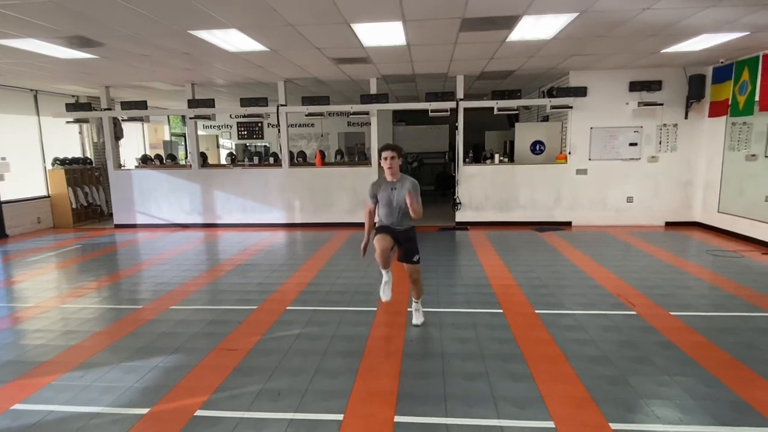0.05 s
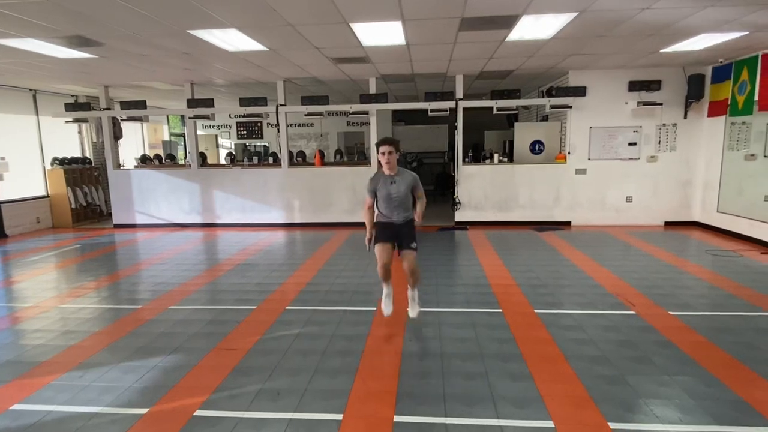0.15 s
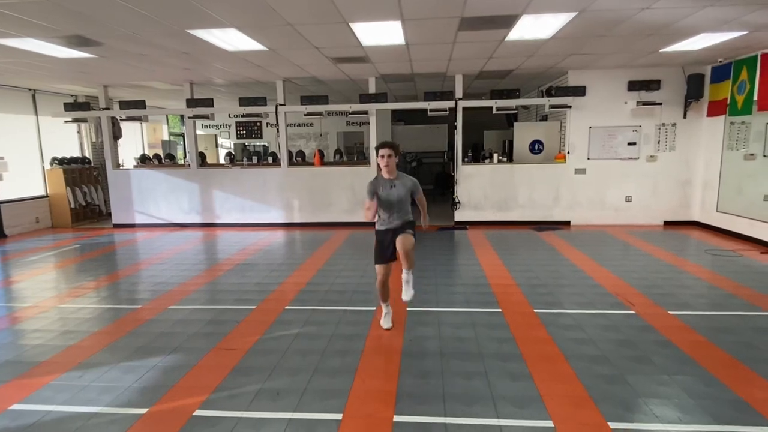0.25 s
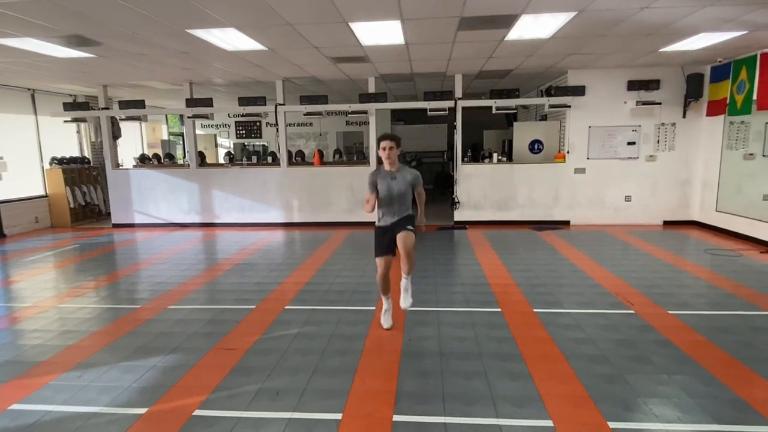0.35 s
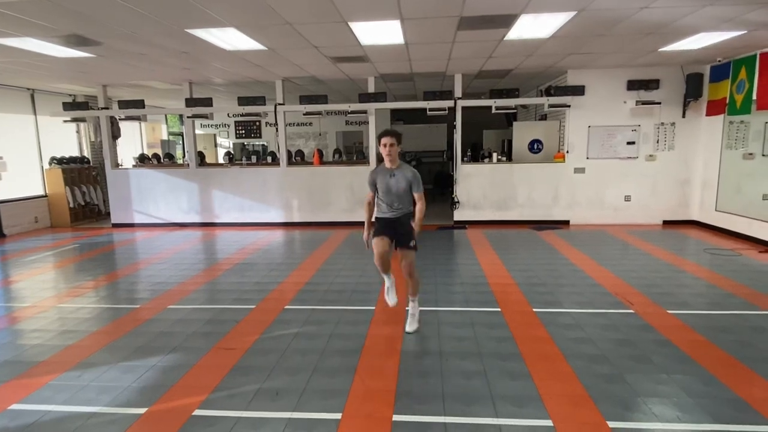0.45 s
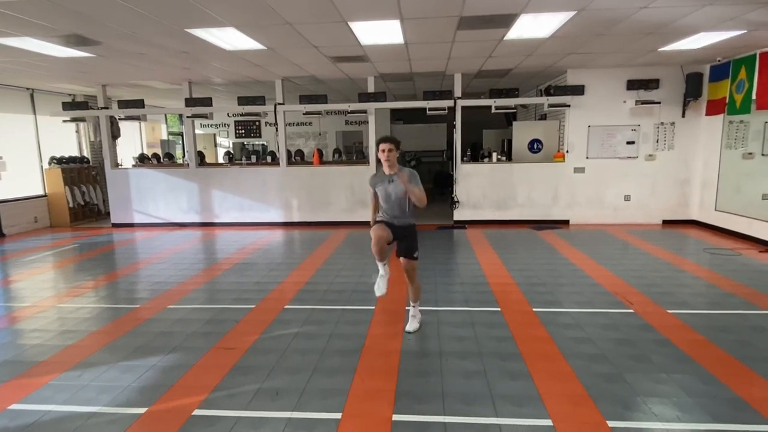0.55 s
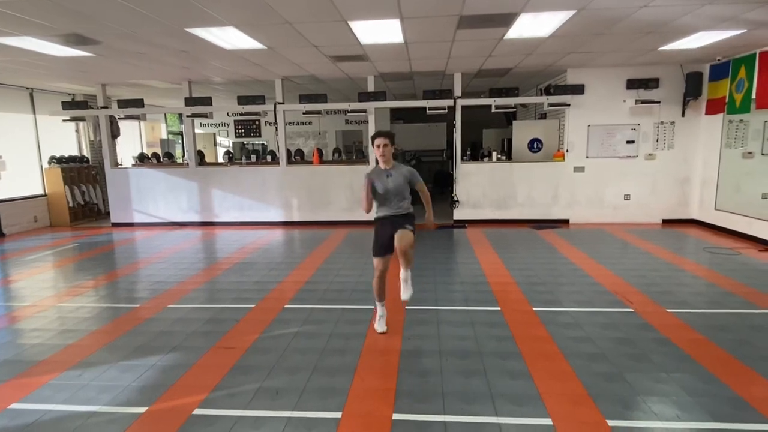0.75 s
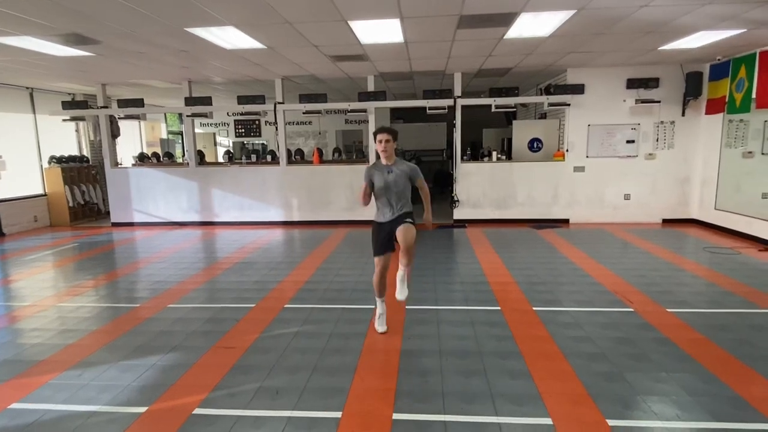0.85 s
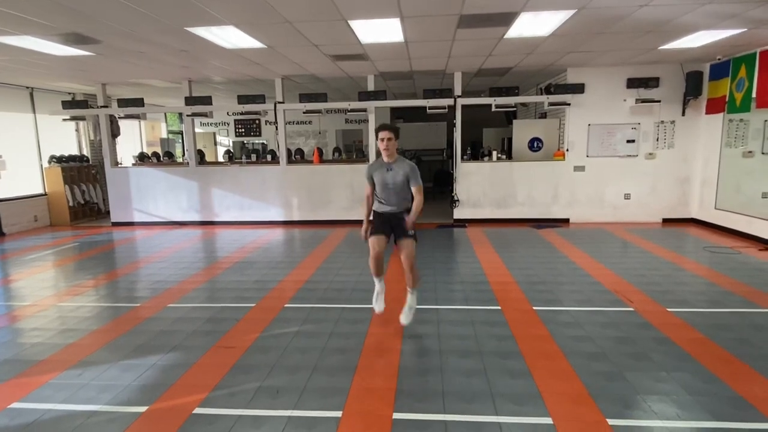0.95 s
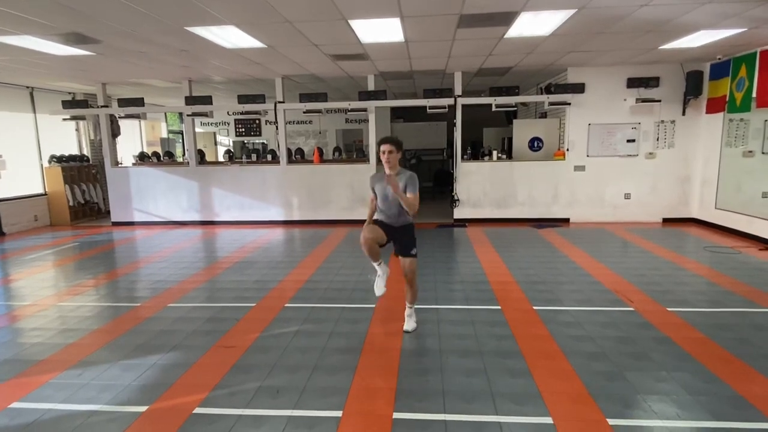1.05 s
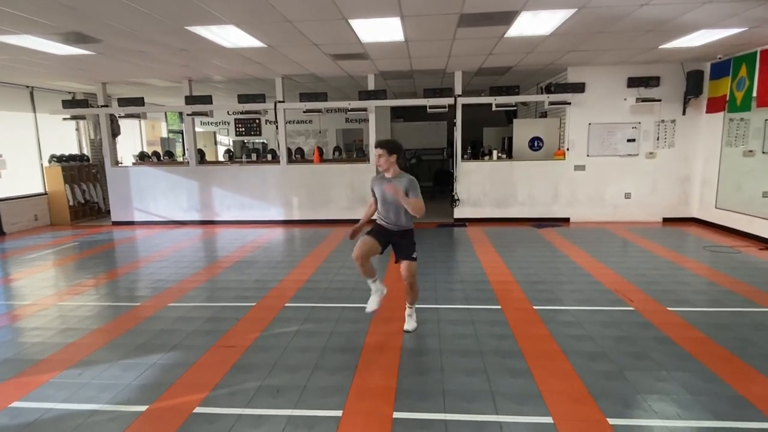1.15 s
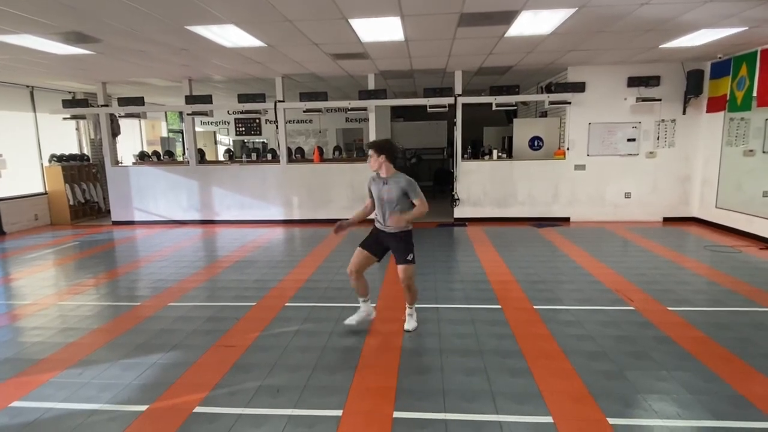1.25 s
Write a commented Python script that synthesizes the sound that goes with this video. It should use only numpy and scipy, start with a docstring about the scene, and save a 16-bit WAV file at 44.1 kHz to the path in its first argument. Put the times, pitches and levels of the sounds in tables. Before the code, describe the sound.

Running footsteps in trainers land on hollow plastic tiles a few metres away. Four quick, even thuds come with sole slaps, light rattles and faint scuffs, echoing in a gym over a low ventilation hum.

```python
"""A gym with a floor of hollow plastic tiles, where someone runs in trainers a few metres away.
Each impact excites the bending modes of a tile; the sole ticks and slaps, the tile joints rattle,
and short clacks and a softer heel contact may follow. Brushing soles add stick-slip friction noise.
Ceiling and walls return early reflections and a diffuse tail, over a low ventilation hum."""
import sys
import numpy as np
from scipy import signal
from scipy.fft import rfft, irfft
from scipy.io import wavfile

SR = 44100
rng = np.random.default_rng(int(sys.argv[2]) if len(sys.argv) > 2 else 0)


def inscribe(sig):
    """Save sig as 16-bit PCM at rate SR to the path in sys.argv[1].

    A 1-D sig is mono; a 2-D sig holds one channel per row.
    Samples are clipped to [-1, 1] before scaling.
    """
    pcm = np.round(np.clip(np.atleast_2d(sig).T, -1, 1) * 32767)
    wavfile.write(sys.argv[1], SR, pcm.astype(np.int16))


N = 57330
LEAD = int(.2 * SR)  # run-in, so that the hall already rings at time zero
T = np.arange(-LEAD, N) / SR


def amp(db):
    """Decibels to amplitude ratio."""
    return 10 ** (np.asarray(db) / 20)


def pan(db):
    """Left and right gains for a level difference."""
    return amp(np.array([[db], [-db]]) / 2)


def curve(hz, table, column=1):
    """Interpolation of a table column over log frequency."""
    rows = np.array(table, float)
    return np.interp(np.log(np.maximum(hz, 1)), np.log(rows[:, 0]), rows[:, column])


def colour(x, spectrum):
    """Minimum-phase filter with the given spectral shape and unit power gain."""
    size = 8192
    gain = amp(curve(np.fft.rfftfreq(size, 1 / SR), spectrum))
    cepstrum = irfft(np.log(gain / np.sqrt(np.mean(gain ** 2))))
    cepstrum[1:size // 2] *= 2
    cepstrum[size // 2 + 1:] = 0
    response = irfft(np.exp(rfft(cepstrum)))[None, :size // 2]
    return signal.fftconvolve(x, response, axes=1)[:, :len(T)]


def soften(x, hz):
    """First-order low-pass."""
    return signal.sosfilt(signal.butter(1, hz, fs=SR, output="sos"), x)


def late(x, delay):
    """Propagation delay of one channel."""
    return np.interp(T - delay, T, x, left=0)


def stereo(mid, side, correlation):
    """Sum and difference of independent signals give a partly correlated pair."""
    return np.sqrt((1 + correlation) / 2) * mid + np.sqrt((1 - correlation) / 2) * np.array([side, -side])


def noise(correlation):
    """Partly correlated left and right white noise."""
    return stereo(*rng.standard_normal((2, len(T))), correlation)


def strike(age, rise, decay):
    """Transient envelope: exponential rise and decay, time constants in seconds."""
    age = np.maximum(age, 0)
    return (1 - np.exp(-age / rise)) * np.exp(-age / decay)


# Airflow spectrum: (frequency [Hz], relative level [dB])
AIR_SPECTRUM = [(20, -9), (40, -6), (61, 8), (130, 1.5), (256, 3), (384, -8.5), (607, -14.5), (2100, -17.5),
                (5400, -40.5), (8400, -37.5), (16000, -57)]
def ventilation():
    """A tone over broadband noise: a low, wavering hum and a soft rush of air."""
    hum_hz, hum_db, air_db = 47.8, -53.5, -54.5
    waver_db = .5 * np.interp(T, np.linspace(T[0], T[-1], 16), rng.standard_normal(16))
    hum = np.sqrt(2) * amp(hum_db + waver_db) * np.sin(2 * np.pi * hum_hz * T)
    return hum + amp(air_db) * colour(noise(correlation=.75), AIR_SPECTRUM)


# Diffuse tail: (frequency [Hz], level [dB], decay time T60 [s])
TAIL_BANDS = [(61.6, -36, 1), (129.3, 7, 0.52), (244, -4.5, 0.55), (336, -3.5, 0.43), (417, -4.5, 0.29),
              (680, -4, 0.63), (1420, -4, 0.63), (2900, -1, 0.58), (4800, 0, 0.88), (9650, -4.5, 0.44),
              (17100, -7.5, 0.13)]
# Coherence of the diffuse field: (frequency [Hz], left-right correlation [0-1])
TAIL_CORRELATION = [(60, 0.98), (140, 1), (250, 0.61), (450, 0.013), (1500, 0.032), (5000, 0.022)]
def reverberation(x):
    """A diffuse tail that fades exponentially, with the highest treble rolled off."""
    age = T - T[0] - .002  # 2 ms pre-delay
    octave = np.log2(np.maximum(np.fft.rfftfreq(len(T), 1 / SR), 1))
    white = rfft(noise(0))
    tail = 0
    for hz in 1000 * 2. ** (np.arange(-9, 9) / 2):  # half-octave bands
        band = np.cos(np.pi / 2 * np.clip(2 * (octave - np.log2(hz)), -1, 1)) ** 2
        decay = curve(hz, TAIL_BANDS, column=2) / np.log(1000)
        waves = irfft(white * band, len(T)) * strike(age, rise=.0081, decay=decay)
        waves *= np.sqrt(np.mean(band ** 2) / np.sum(waves ** 2, axis=1, keepdims=True))
        tail += amp(curve(hz, TAIL_BANDS)) * stereo(*waves, curve(hz, TAIL_CORRELATION))
    return pan(db=2.5) * signal.fftconvolve(x, tail, axes=1)[:, :len(T)]


# Echo paths: (delay [s], extra delay on the right [s], left level [dB], right level [dB], cutoff [Hz])
ECHO_PATHS = [(0.0119, .0003, -10.5, -10, 9000), (0.0205, -.0009, -16.5, -29, 4000),
              (0.0279, .0011, -16.5, -18.5, 4000), (0.0325, 0.00092, -16, -9.5, 5000),
              (0.0408, -0.0071, -14, -16, 10000), (.047, .0008, -12, -13.5, 3000)]
def early_reflections(x):
    """Specular reflection: ceiling and walls return delayed, weaker, duller copies."""
    out = np.zeros_like(x)
    for delay, skew, left_db, right_db, cutoff_hz in ECHO_PATHS:
        left, right = soften(x, cutoff_hz)
        out[0] += amp(left_db) * late(left, delay)
        out[1] += amp(right_db) * late(right, delay + skew)
    return out


CONTACT_CORRELATION = .55  # between left and right, for scuffs, clatter, rattle and slaps
# Soles brushing the floor: (time [s], level [dB], decay [s], centre frequency [Hz])
BRUSHES = [(.222, -49.5, 0.0078, 6850), (0.235, -45, 0.013, 4130), (0.484, -54.5, 0.032, 3512),
           (0.7195, -43, 0.0035, 6370), (.738, -47.5, 0.0075, 6140), (1.021, -46.5, 0.04, 2220),
           (1.069, -52.5, 0.038, 4600), (1.271, -57.5, 0.032, 2692)]
# Friction spectrum: (frequency / centre frequency [ratio], relative level [dB])
FRICTION_SPECTRUM = [(.1, -25), (.5, -12.5), (.8, -0.5), (1, 2), (1.3, -10), (1.8, -11.5), (3, -35)]
def scuffs():
    """Stick-slip friction: a brushing sole catches and slips, so its noise jumps in level."""
    slips_per_s, spread_db = 480, 5.5
    slip_index = np.cumsum(rng.random(len(T)) < slips_per_s / SR)
    grit = amp(spread_db * rng.uniform(-1, 1, len(T)))[slip_index]
    out = 0
    for start, db, decay, centre_hz in BRUSHES:
        envelope = amp(db) * grit * strike(T - start, rise=.002, decay=decay)
        spectrum = [(centre_hz * ratio, level) for ratio, level in FRICTION_SPECTRUM]
        out += colour(envelope * noise(CONTACT_CORRELATION), spectrum)
    return out


# Short clacks and bright clicks after the steps: (time [s], clack level [dB], click level [dB])
CLATTER_EVENTS = [(0.2168, -47, -32), (.3146, -34, -46), (0.5033, -23.5, -44), (.5155, -28, -44),
                  (0.5311, -45, -40.5), (0.54, -53, -45), (0.725, -54, -49), (.745, -47, -51),
                  (1.009, -24.5, -54), (1.022, -27, -50)]
# Spectra of the clack and the click: (frequency [Hz], relative level [dB])
CLACK_SPECTRUM = [(700, -16), (1800, 7), (2600, 1.5), (3800, -14), (8000, -37)]
CLICK_SPECTRUM = [(2000, -23), (5000, 2.5), (11000, 1), (14000, -29)]
def clatter():
    """Broadband transients: short noise bursts stand for sharp echoes and tile clatter."""
    clack = click = 0
    for start, clack_db, click_db in CLATTER_EVENTS:
        pulse = strike(T - start, rise=.00054, decay=.00095)
        clack += amp(clack_db) * pulse
        click += amp(click_db) * pulse
    clacks = colour(clack * noise(CONTACT_CORRELATION), CLACK_SPECTRUM)
    return clacks + colour(click * noise(CONTACT_CORRELATION), CLICK_SPECTRUM)


# Spectrum of shaken joints: (frequency [Hz], relative level [dB])
RATTLE_SPECTRUM = [(100, -11), (350, 15.5), (700, 7.5), (1400, 7), (2300, -9), (3500, -15), (5200, -25.5),
                   (9000, -26), (16000, -41)]
def joint_rattle(contacts):
    """Shot noise: each contact shakes a spatter of randomly timed clicks from the tile joints."""
    clicks_per_s, spread_db = 730, .5
    envelope = sum(amp(db) * strike(T - start, rise=.011, decay=.022)
                   for start, _, _, _, _, _, _, db, *_ in contacts)
    clicks = np.sign(noise(CONTACT_CORRELATION)) * (rng.random(len(T)) < clicks_per_s / SR)
    clicks *= amp(spread_db * rng.uniform(-1, 1, len(T)))
    return colour(envelope * clicks / clicks.std(), RATTLE_SPECTRUM)


# Spectrum of the first touch: (frequency [Hz], relative level [dB])
TICK_SPECTRUM = [(500, -29.5), (2500, -2.5), (3700, -5.5), (6000, 3), (8000, -1), (10500, 2.5),
                 (13000, -8.5), (16000, -5)]
def sole_ticks(steps):
    """A brief contact has a wide bandwidth: rubber first meets plastic with a bright tick."""
    pivot_hz = 6000
    out = 0
    for start, *_, tick_db, tilt in steps:
        spectrum = [(hz, db + tilt * np.log2(hz / pivot_hz)) for hz, db in TICK_SPECTRUM]
        envelope = amp(tick_db) * strike(T - start, rise=.0015, decay=.0014)
        out += colour(envelope * noise(0), spectrum)
    return out


# Spectrum of a flattening sole: (frequency [Hz], relative level [dB])
SLAP_SPECTRUM = [(100, -43), (400, 0), (900, 3.5), (1450, 1.5), (2000, -0.5), (2800, -6.5), (4000, -19.5),
                 (8000, -30), (11500, -26), (16000, -77)]
def sole_slaps(contacts, rise, decay):
    """Impact noise: a short burst as each sole flattens on the tile."""
    envelope = sum(amp(db) * strike(T - start, rise, decay) for start, _, _, _, _, _, db, *_ in contacts)
    return colour(envelope * noise(CONTACT_CORRELATION), SLAP_SPECTRUM)


# Bending modes of a tile: (frequency [Hz], level [dB], decay time T60 [s])
TILE_MODES = [(93.5, -21, 0.078), (154, -13, 0.034), (223.2, -8.5, 0.048), (256.7, 4, 0.047),
              (321, -9.5, 0.041), (391.6, -6.5, 0.042), (487.3, -14, 0.057), (649, -0.5, 0.022),
              (735, -18, 0.028), (913, -12, 0.024), (1072, -21.5, 0.071), (1387, -23.5, 0.029),
              (1836, -25, 0.015)]
# Where the weight, thump, hollow and knock bands of the impact force act: (frequency [Hz])
FORCE_BANDS = [160, 252, 372, 596]
def tile_ring(age, forces_db, pitch):
    """Modal vibration: the hollow tile rings as damped sinusoids; low bending waves arrive later."""
    lag_cycles, rise_cycles = .38, .75
    out = np.zeros(len(T))
    live = (age > 0) & (age < .5)
    for hz, db, t60 in TILE_MODES:
        since = np.maximum(age[live] - lag_cycles / hz, 0)
        swell = (1 - np.exp(-since * hz / rise_cycles)) ** 2
        damping = np.exp(-np.log(1000) * since / t60)
        gain = amp(db + np.interp(hz, FORCE_BANDS, forces_db))
        out[live] += gain * swell * damping * np.sin(2 * np.pi * hz * pitch * since)
    return out


# Landings: (time [s], weight [dB], thump [dB], hollow [dB], knock [dB], tile pitch [ratio],
# slap [dB], rattle [dB], tick [dB], tick tilt [dB/octave])
LANDINGS = [(-.105, -14.5, -26.5, -22, -17.5, 1.01, -19.5, -25.5, -26.5, 4),
            (0.2032, -6, -4.5, -6.5, -6, 1.016, -15, -21.5, -19, 1),
            (0.463, -26, -14.5, -9.5, -18, 1.026, -17.5, -27.5, -24, -9),
            (0.7039, -14.5, -22, -11.5, -17.5, .99, -22.5, -34.5, -27, -5),
            (0.9923, -44, -15.5, -11.5, -10, 1.027, -38, -26.5, -23.5, -9)]
# Heels coming down: (time [s], weight [dB], thump [dB], hollow [dB], knock [dB], tile pitch [ratio],
# slap [dB], rattle [dB])
HEEL_CONTACTS = [(0.282, -12, -25, -22.5, -26.5, 1.24, -34, -36.5),
                 (0.5282, -20, -22.5, -39, -27, 1.017, -25, -34),
                 (0.7822, -37, -23.5, -26.5, -28.5, 1.024, -26, -36.5),
                 (1.015, -39, -28, -42, -26, 1.17, -34, -37), (1.0550, -19, -24, -19, -18.5, .96, -22, -37)]
def footfalls():
    """Impact excitation: each contact drives tile, joints and sole; each spot has its own pitch."""
    contacts = LANDINGS + HEEL_CONTACTS
    ring = sum(tile_ring(T - start, [weight, thump, hollow, knock], pitch)
               for start, weight, thump, hollow, knock, pitch, *_ in contacts)
    tiles = pan(db=-.36) * np.array([ring, late(ring, delay=.00008)])  # reaches the right later
    rattle = joint_rattle(contacts)
    # A heel rolls down: slower and duller than the first slap.
    heels = soften(sole_slaps(HEEL_CONTACTS, rise=.0037, decay=.0036), hz=4400)
    slaps = sole_slaps(LANDINGS, rise=.002, decay=.0023)
    return tiles + pan(db=.5) * (slaps + heels + rattle) + sole_ticks(LANDINGS)


def scene():
    """Superposition of the direct sound, its reflections and the ventilation."""
    direct = footfalls() + scuffs() + clatter()
    return (direct + early_reflections(direct) + reverberation(direct) + ventilation())[:, LEAD:]


# Microphone balance: (frequency [Hz], left minus right level [dB])
MIC_RESPONSE = [(250, 1), (1000, 1), (2100, -2), (3300, -0.5), (4800, 7), (8000, -0.5), (12000, -3.5)]
def record(dry):
    """Frequency response: two microphones of slightly unequal colour, then a steep low-pass."""
    cutoff_hz = 16200
    balance_db = curve(np.fft.rfftfreq(2 * N, 1 / SR), MIC_RESPONSE)
    gains = amp(np.array([balance_db, -balance_db]) / 2)
    heard = irfft(rfft(dry, 2 * N) * gains)[:, :N]
    return signal.sosfilt(signal.ellip(8, .2, 70, cutoff_hz, fs=SR, output="sos"), heard)


dry = scene()
out = record(dry)
inscribe(out)
```